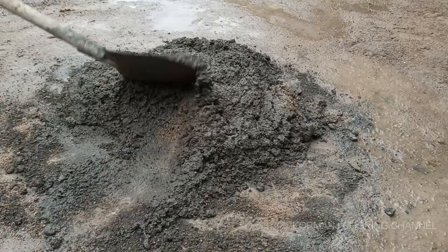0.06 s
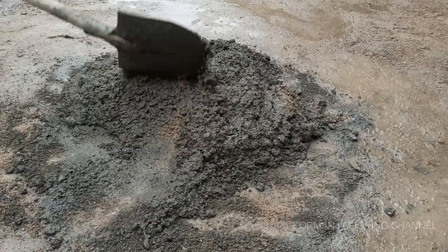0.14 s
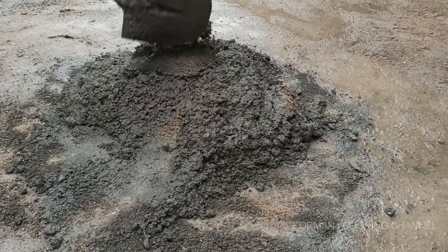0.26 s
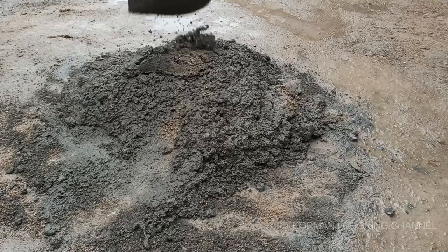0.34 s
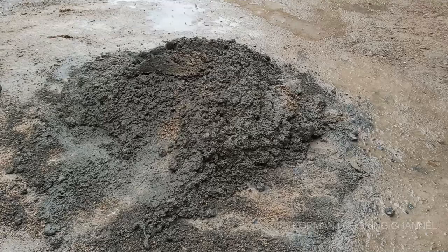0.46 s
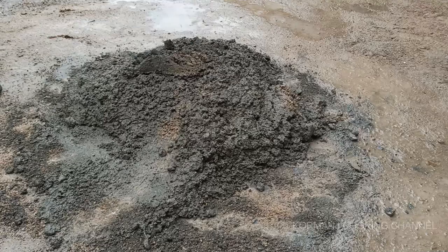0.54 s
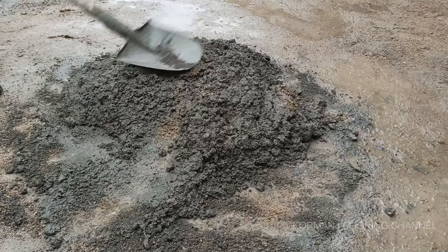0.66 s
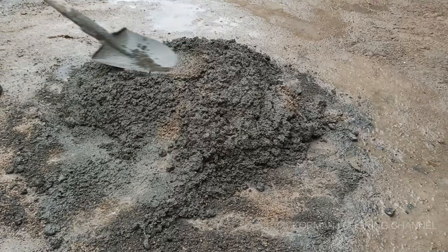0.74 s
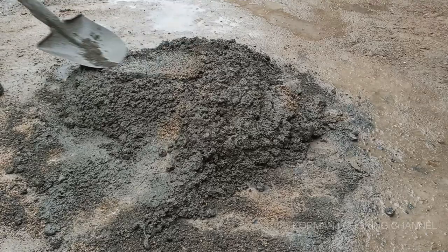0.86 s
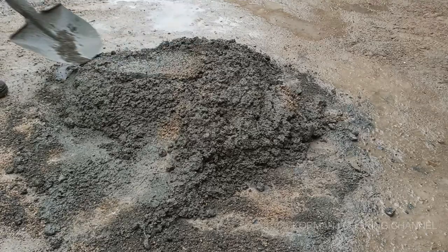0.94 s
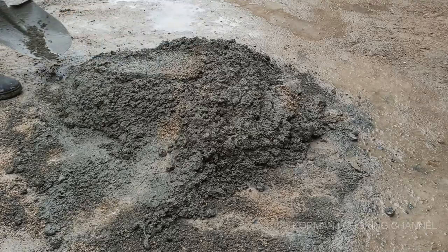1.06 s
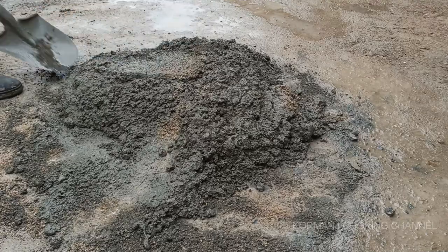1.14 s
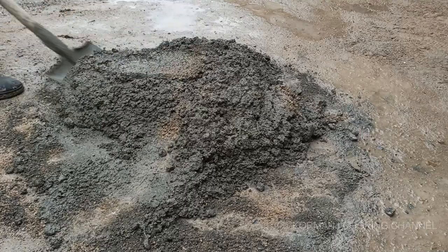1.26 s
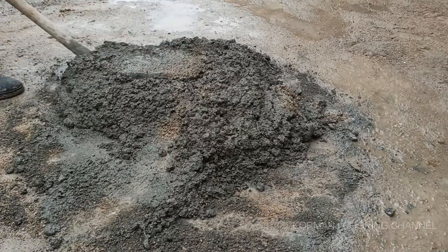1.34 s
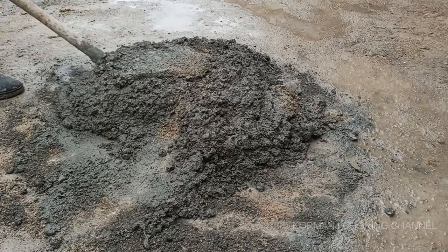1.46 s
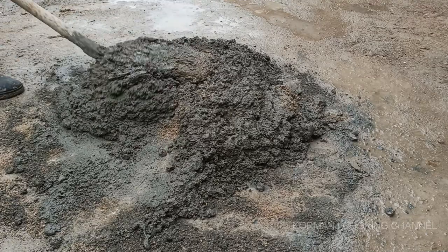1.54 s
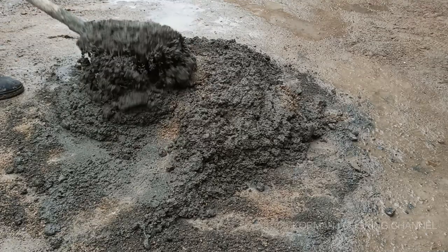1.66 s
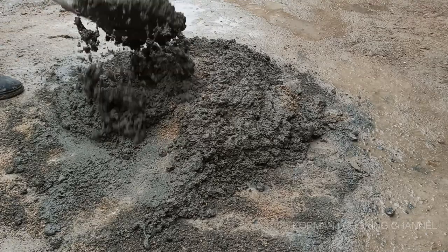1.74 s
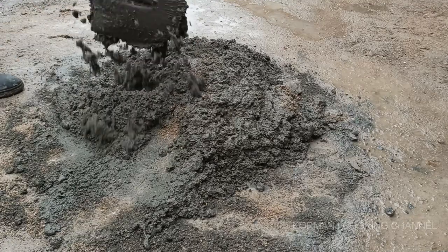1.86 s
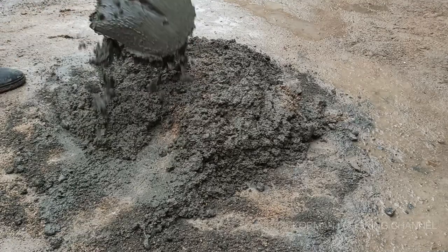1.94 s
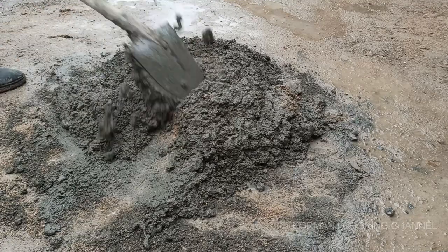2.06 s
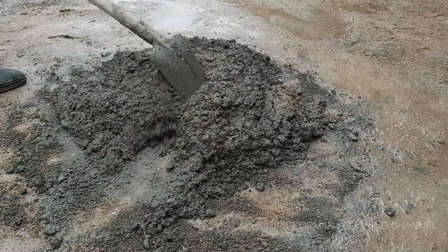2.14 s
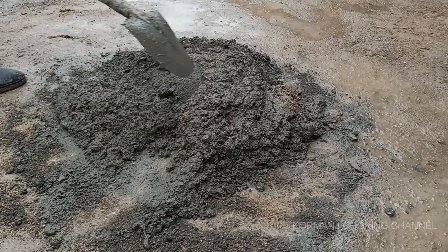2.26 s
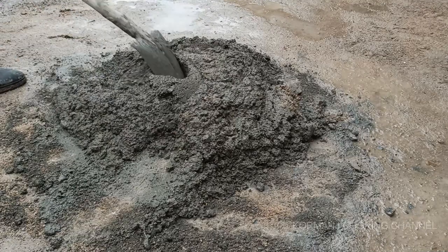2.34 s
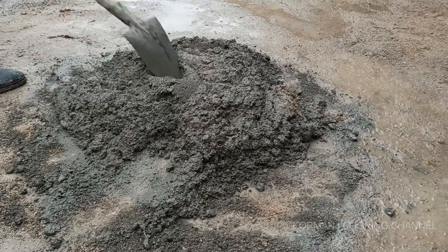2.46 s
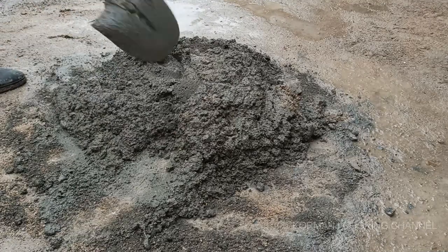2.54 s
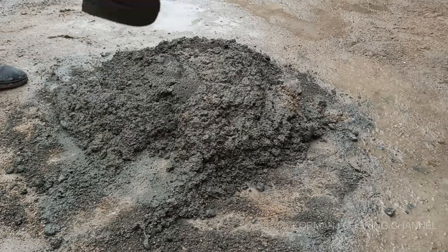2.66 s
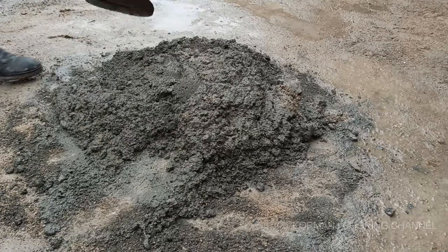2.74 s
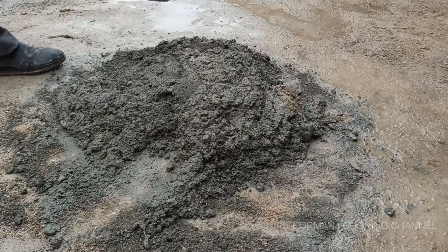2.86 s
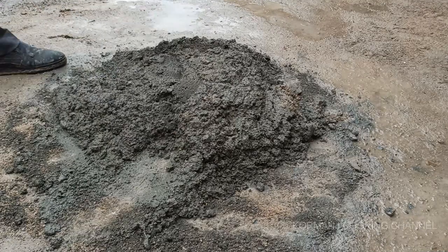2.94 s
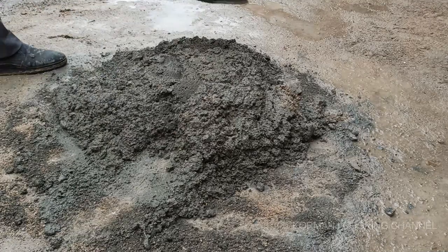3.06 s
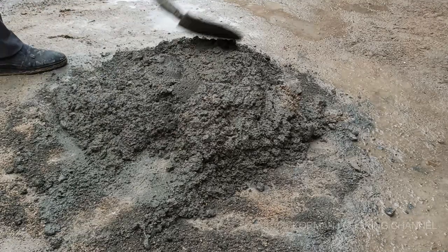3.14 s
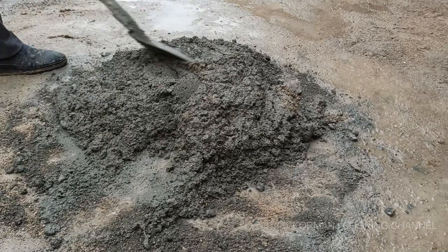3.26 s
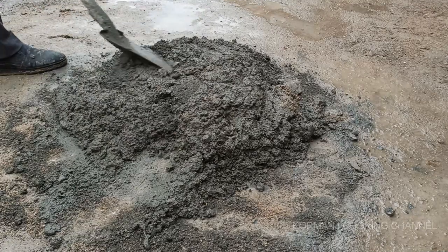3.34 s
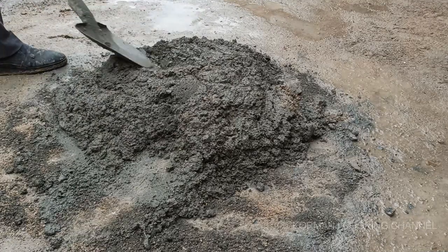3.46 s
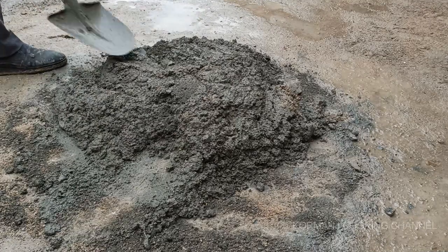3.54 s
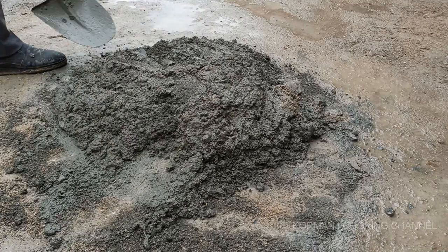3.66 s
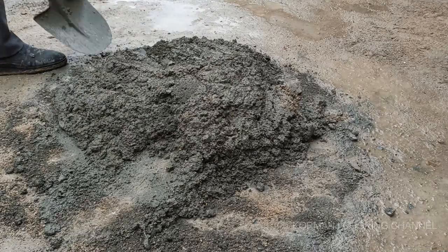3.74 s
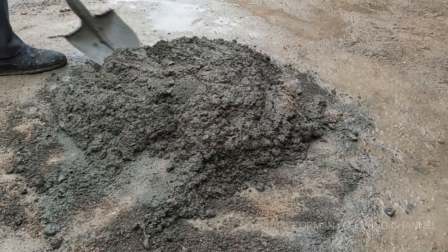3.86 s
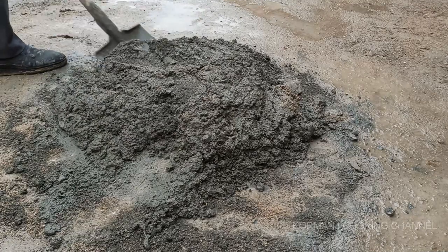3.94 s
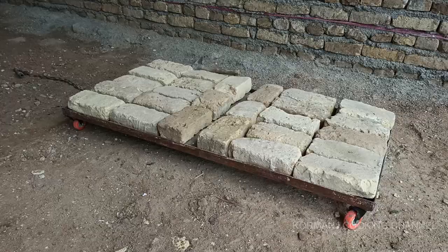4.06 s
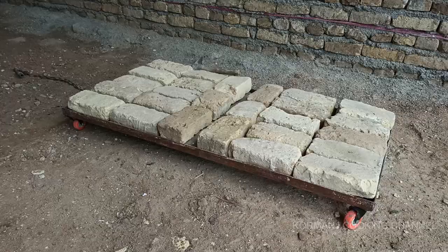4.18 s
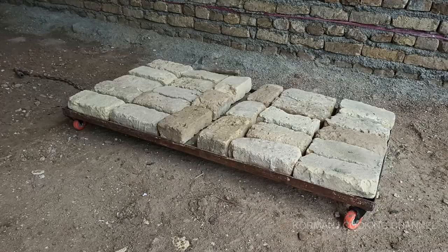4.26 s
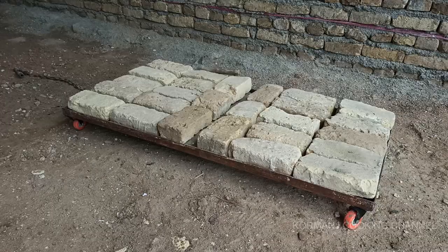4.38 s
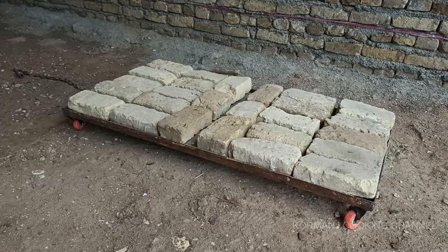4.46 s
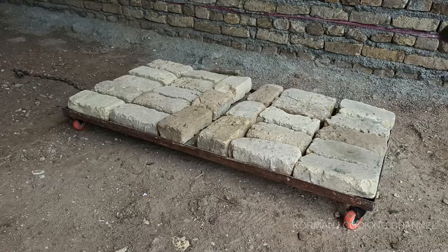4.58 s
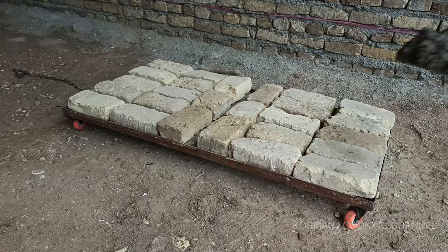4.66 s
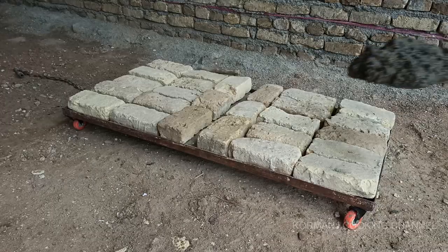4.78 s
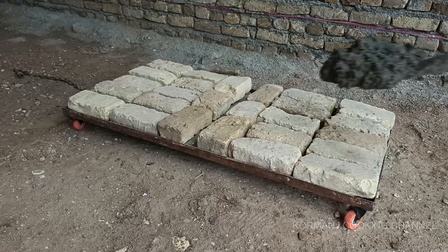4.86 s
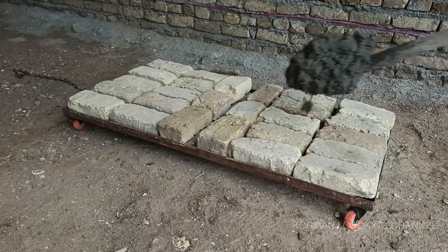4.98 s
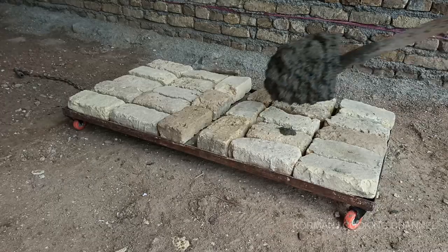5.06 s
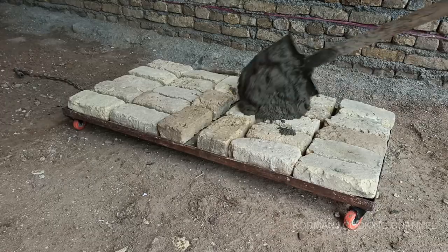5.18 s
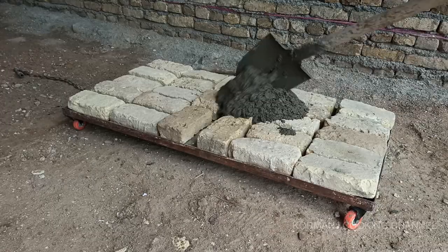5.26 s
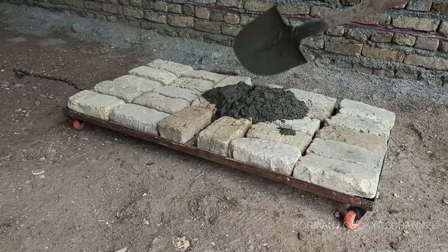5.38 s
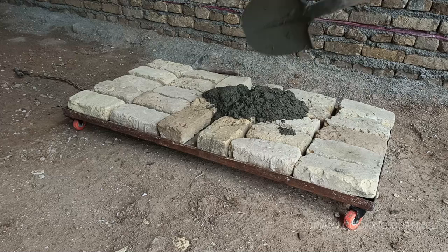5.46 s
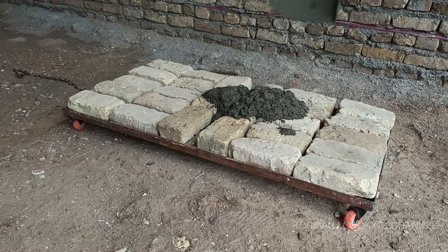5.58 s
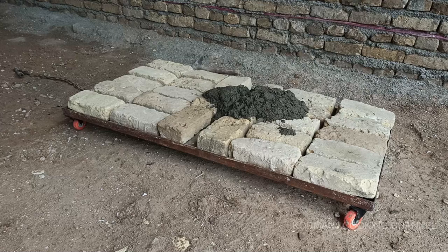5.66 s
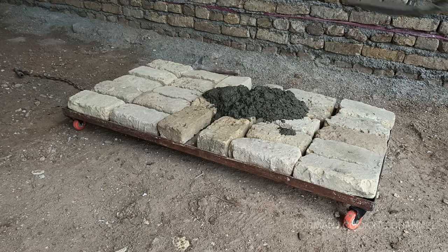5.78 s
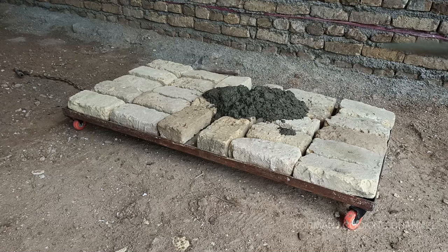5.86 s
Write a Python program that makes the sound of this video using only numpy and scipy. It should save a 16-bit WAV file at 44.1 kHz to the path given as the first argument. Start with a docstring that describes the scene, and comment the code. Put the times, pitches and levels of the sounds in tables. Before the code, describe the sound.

A steel shovel works wet concrete in a yard, slightly left of the microphone, over low outdoor air. After a faint sliding hiss, the blade strikes and scrapes grit at 0.7 seconds. At 1.3 it hits harder and crunches into the heap, with wet slaps around 1.4. The mix slides off the steel in a swelling hiss, with lighter scrapes and plops from 2.1 to 2.6. A sharp strike and rasp come at 3.2. Another strong dig at 3.9 brings a cluster of slaps and dull thumps. From about 4.2 a distant machine hums faintly and the work moves slightly right. A pebble clicks sharply at 4.7, and between 5.1 and 5.5 a load slides onto bricks with a plop and more stone clicks. A small squelch follows at 5.7. Crumbs tick throughout, and the walls return a faint echo.

```python
"""A steel shovel works a heap of wet concrete on a hard yard floor, a little left of the microphone.
The blade strikes, grinds through grit and ploughs into the mix, which slides off and slaps down.
Then a load is tipped onto bricks near a wall. Small stones tick, pockets in the wet mix squelch,
and the yard walls answer faintly. Behind it all is open air and, by the wall, a far-off machine's hum."""
import sys
import numpy as np
from scipy import signal
from scipy.fft import rfft, irfft, next_fast_len
from scipy.io import wavfile
from scipy.ndimage import map_coordinates

SR = 44100
rng = np.random.default_rng(int(sys.argv[2]) if len(sys.argv) > 2 else 0)


def unload_audio(sound):
    """Save the sound as a 16-bit wav file, at the path given as the first command line argument."""
    columns = np.transpose(np.atleast_2d(sound))
    # keep every value between -1 and 1, then stretch to whole-number steps
    steps = np.round(np.clip(columns, -1, 1) * 32767)
    wavfile.write(sys.argv[1], SR, steps.astype(np.int16))


N = 261072


def amp(db):
    """Decibels to gain."""
    return 10 ** (np.asarray(db) / 20)


def unit(x):
    """Scale to rms 1."""
    return x / np.sqrt(np.mean(x ** 2) + 1e-20)


def peaked(x, db):
    """Scale so that the mean of the left and right peaks reaches db."""
    return amp(db) * x / np.abs(x).max(axis=1).mean()


def along(points, hz):
    """Read (Hz, value) points on a log axis."""
    f, v = np.transpose(points)
    return np.interp(np.log(hz + 1), np.log(f + 1), v)


def wobble(n, rate):
    """A smooth random curve of n samples, rate knots a second."""
    return map_coordinates(rng.standard_normal(int(n * rate / SR) + 4), [np.arange(n) * rate / SR])


def filtered(x, response):
    """Pass x through a response given as a function of frequency."""
    n = x.shape[-1]
    m = next_fast_len(n + 8192)
    return irfft(rfft(x, m) * response(np.fft.rfftfreq(m, 1 / SR)), m)[..., :n]


def resonance(f, hz, width_hz):
    """Causal response of one damped mode."""
    return 1j * f * width_hz / (hz * hz - f * f + 1j * f * width_hz)


def add(track, start, sound):
    """Mix a short stereo sound in at start seconds."""
    part = track[:, max(round(start * SR), 0):][:, :sound.shape[1]]
    part += sound[:, :part.shape[1]]


# How alike the microphone's two sides are. Each row: frequency in Hz, correlation.
STEREO_LIKENESS = [(200, .97), (500, .9), (1200, .7), (2500, .42), (6000, .2)]


def spread(pair):
    """Two unrelated signals become left and right, alike in the bass."""
    turn = lambda f: np.arccos(np.clip(along(STEREO_LIKENESS, f), -1, 1)) / 2
    mid, side = filtered(pair, lambda f: np.array([np.cos(turn(f)), np.sin(turn(f))]))
    return np.array([mid + side, mid - side])


def noise(n, spectrum):
    """Steady stereo noise of rms 1, shaped by (Hz, dB) points."""
    return unit(filtered(spread(rng.standard_normal((2, n))), lambda f: amp(along(spectrum, f))))


def burst(response, rise, t60):
    """A short stereo puff of noise through a response; rise and t60 are in seconds."""
    t = np.arange(SR // 4) / SR
    puff = rng.standard_normal((2, len(t))) * (1 - np.exp(-t / rise)) * amp(-60 * t / t60)
    return filtered(spread(puff), response)


def grains(n, rate, scatter_db, bed, life):
    """Stereo crackle: tiny fractures of scattered size over a bed of countless smaller ones."""
    sizes = (rng.random(n) < rate / SR) * amp(scatter_db * np.clip(rng.standard_normal(n), -2, 2))
    power = signal.lfilter([1], [1, -np.exp(-1 / (life * SR))], sizes ** 2)
    return spread(rng.standard_normal((2, n)) * np.sqrt(power / power.mean() + bed ** 2))


def stroke(start, stop, attack, t60):
    """Times of one movement, and a gate that opens, holds until it stops, then dies away."""
    t = np.arange(start, stop + t60, 1 / SR)
    return t, np.minimum((t - start) / attack, 1) * amp(-60 * np.maximum(t - stop, 0) / t60)


# The air over the yard. Each row: frequency in Hz, relative level in dB.
AIR_SPECTRUM = [(25, -34), (45, -15), (80, -6), (200, -0.5), (400, -3), (900, -14.5), (1600, -33.5),
                (4000, -24), (9000, -22)]


def open_air():
    """A low, gently wavering murk all around the microphone."""
    return noise(N, AIR_SPECTRUM) * amp(-53.0 + 2.4 * wobble(N, 4.89))


# The machine's tones, from far off. Each row: pitch in Hz, level in dB.
HUM_TONES = [(105, -60), (199, -62.5), (301, -54)]


def distant_machine():
    """An unsteady hum, heard beside the wall: it comes in just before the work reaches the bricks."""
    t = np.arange(N) / SR
    hum = sum(amp(db + 2.8 * wobble(N, 11)) * np.sin(2 * np.pi * hz * t + 1.56 * wobble(N, 29))
              for hz, db in HUM_TONES)
    return hum * np.interp(t, [4.1, 4.25], [0, 1])


# The yard's reverberation. Each row: frequency in Hz, t60 in seconds.
WALL_DECAY = [(150, 0.81), (1500, 0.25), (6000, 0.2), (15000, 0.14)]


def walls(x):
    """The tail that comes back from the yard walls, dying faster in the treble."""
    hz, t, spectra = signal.stft(rng.standard_normal((2, SR // 2)), SR, nperseg=256)
    decay = amp(-60 * t / along(WALL_DECAY, hz)[:, None])
    tail = spread(signal.istft(spectra * decay, SR, nperseg=256)[1])
    delayed = np.pad(tail, ((0, 0), (300, 0))) / np.linalg.norm(tail[0])
    return signal.fftconvolve(x, delayed, axes=1)[:, :N]


def crumbs():
    """Crumbs of the mix drop and settle all the time, with tiny bright ticks."""
    scatter_db = 4 * np.clip(rng.standard_normal((2, N)), -2, 2)
    ticks = (rng.random(N) < 12 / SR) * amp(-33.5 + scatter_db)
    return filtered(ticks, lambda f: resonance(f, hz=6000, width_hz=25500))


# The wet mix sucks and spits. Each row: start in seconds, level in dB, pitch in Hz,
# time scale of rise and decay in seconds.
POCKETS = [(0.154, -36.5, 3150, 0.0244), (2.949, -34, 5230, 0.034), (3.662, -44, 5500, 0.027),
           (3.741, -38.5, 1190, 0.01), (4.268, -39, 6500, 0.014), (4.507, -40, 864, 0.028),
           (4.873, -36.5, 6120, 0.03), (5.122, -33.5, 7650, 0.013), (5.719, -25.5, 4925, 0.017)]


def squelches():
    """Air and water squeeze through pockets in the mix: large ones plop, tiny ones only spit."""
    out = np.zeros((2, N))
    for start, db, hz, scale in POCKETS:
        width_hz = 0.27 * hz * np.sqrt(hz / 1000)
        pocket = burst(lambda f: resonance(f, hz, width_hz) ** 2, rise=0.1 * scale, t60=4 * scale)
        add(out, start, peaked(pocket, db + 4))
    return out


# Loose stones around the shovel. Each row: start in seconds, level in dB, pitch in Hz.
STONE_CLICKS = [(1.179, -26.5, 4300), (1.2221, -29, 7500), (1.9847, -22, 6100), (2.8287, -35, 6500),
                (3.0746, -26.5, 3800), (3.569, -32, 5510), (3.7952, -31, 9000), (4.3225, -40, 8000),
                (4.7125, -15.5, 2600), (4.793, -27.5, 4600), (5.226, -23.5, 2250), (5.2601, -15.5, 2320),
                (5.3993, -20, 1910), (5.7139, -25, 5100)]


def stones():
    """Single pebbles click, each at its own pitch, snap brightly and crush a little sand."""
    out = np.zeros((2, N))
    impulse = np.eye(1, SR // 4).repeat(2, axis=0)
    for start, db, hz in STONE_CLICKS:
        click = filtered(impulse, lambda f: resonance(f, hz, width_hz=0.77 * hz) ** 2)
        snap = filtered(impulse, lambda f: resonance(f, hz=2 * hz, width_hz=3 * hz))
        sand = burst(lambda f: resonance(f, hz, width_hz=0.53 * hz), rise=0.0001, t60=0.014)
        add(out, start, peaked(click, db + 1) + peaked(snap, db - 1) + peaked(sand, db - 4))
    return out


# Lumps come down on the heap, later on the bricks. Each row: time in seconds, level of plop and
# splat in dB, plop pitch in Hz, thump level in dB.
LUMPS = [(0.752, -19, 676, -28), (1.399, -14, 506, -29), (1.434, -11.5, 413, -18), (1.907, -40, 497, -34),
         (2.121, -25, 600, -23), (2.435, -30, 397.6, -33.5), (3.951, -9, 560, -18), (3.997, -17, 330, -14),
         (4.052, -13.5, 484, -17), (4.264, -31.5, 284, -41), (4.77, -35.5, 404, -29.5),
         (5.26, -20, 660, -18)]


def slaps():
    """Wet lumps land with a hollow plop, a splat and a dull thump of the ground."""
    out = np.zeros((2, N))
    for time, db, hz, thump_db in LUMPS:
        plop = burst(lambda f: resonance(f, hz, width_hz=0.69 * hz) ** 2, rise=0.00044, t60=0.047)
        splat = burst(lambda f: resonance(f, hz=955, width_hz=1150), rise=0.0004, t60=0.045)
        thump = burst(lambda f: resonance(f, hz=179.3, width_hz=100) ** 2, rise=0.00087, t60=0.037)
        add(out, time - 0.002, peaked(plop, db - 4) + peaked(splat, db - 12) + peaked(thump, thump_db - 6))
    return out


# The muddy blade's main modes. Each row: pitch in Hz, width in Hz, gain in dB.
BLADE_MODES = [(530, 10, -27), (704, 15, -5.5), (905, 67, -8), (1162, 166, -6), (1667, 49, -4),
               (2600, 86, -2), (3110, 72, -2), (3570, 78, -3), (6740, 80, -12.5)]


def blade(spectrum, direct):
    """The response for contact noise of this spectrum, partly direct and partly rung through the blade."""
    modes = lambda f: sum(amp(db) * resonance(f, hz, width) for hz, width, db in BLADE_MODES)
    return lambda f: amp(along(spectrum, f)) * (direct + modes(f))


def steel_ring(x, ring_db, t60):
    """Add the steel's many weak modes, which shift with every load and grip; none lie in the deep bass."""
    t = np.arange(SR // 6) / SR
    tail = spread(rng.standard_normal((2, len(t))) * amp(-60 * t / t60))
    tail = filtered(tail, lambda f: f ** 2 / (f ** 2 + 350 ** 2))
    ring = signal.fftconvolve(x, tail / np.linalg.norm(tail[0]), axes=1)[:, :x.shape[1]]
    return x + amp(ring_db) * ring


# The blade comes free. Each row: start in seconds, peak in dB, centre of the stirred modes in Hz.
BLADE_LIFTS = [(2.595, -42.5, 1410), (3.15, -47.5, 700)]
FREE_T60, STIRRED_OCTAVES = 0.27, 0.35


def lifts():
    """Out of the mix, nothing damps the blade, and a few of its modes sing on briefly."""
    out = np.zeros((2, N))
    t = np.arange(SR // 3) / SR
    for start, db, centre_hz in BLADE_LIFTS:
        stirred = lambda hz: np.exp(-(np.log2(hz / centre_hz) / STIRRED_OCTAVES) ** 2)
        ring = sum(stirred(hz) * np.sin(2 * np.pi * hz * t + 0.5 * wobble(len(t), 39))
                   for hz, _, _ in BLADE_MODES)
        ring *= (1 - np.exp(-t / 0.012)) * amp(-60 * t / FREE_T60)
        add(out, start, peaked(np.array([ring, ring]), db))
    return out


# Sand against steel. Each row: frequency in Hz, relative level in dB.
SAND_SPECTRUM = [(300, -38), (1200, -7), (2400, -3.5), (3400, 0.5), (4500, 2), (7000, 1), (12000, -5),
                 (16000, -5)]
# Gravel against steel. Each row: frequency in Hz, relative level in dB.
GRAVEL_SPECTRUM = [(50, -21), (100, -16.5), (180, -4), (270, -9), (400, 0.5), (1100, 0), (1900, -0.5),
                   (2700, -5), (4000, -10.5), (7000, -17.5)]


def rub(level, gravel_db, direct, scatter_db, bed):
    """Sand hisses and gravel grinds along the steel; the blade sticks and slips, shaking both."""
    n = len(level)
    sand = grains(n, rate=1700, scatter_db=scatter_db, bed=bed, life=0.00028)
    hiss = unit(filtered(sand, blade(SAND_SPECTRUM, direct)))
    gravel = grains(n, rate=500, scatter_db=4.5, bed=0.85, life=0.00051)
    grind = unit(filtered(gravel, blade(GRAVEL_SPECTRUM, direct=1.0)))
    judder = amp(1.1 * wobble(n, 70) + 0.5 * wobble(n, 18))
    contact = amp(-2.5) * hiss + amp(gravel_db - 2) * grind
    return steel_ring(level * judder * contact, ring_db=-3.5, t60=0.035)


def settling():
    """The heap keeps settling faintly, in fits and starts."""
    return rub(amp(-56 + 1.5 * wobble(N, 14)), gravel_db=-8, direct=6.4, scatter_db=9.5, bed=0.48)


# Wet mix slides over or off the steel. Each row: start, fullest moment and end in seconds,
# fullest level in dB, thinning to either side in dB a second, gravel balance in dB.
MIX_SLIDES = [(0.0, 0.197, 0.565, -42, 10.5, -6.5), (1.449, 2.282, 2.448, -32.5, 17.5, -10),
              (2.451, 2.53, 2.76, -44, 56, -10), (3.062, 3.198, 3.22, -51.5, 37, -2),
              (4.709, 4.723, 4.8, -47, 55, 5), (5.119, 5.325, 5.55, -30.5, 130, -3),
              (5.549, 5.682, 5.88, -49.5, 68, -29)]
CREST_S = 0.032  # a flow rounds off around its fullest moment


def slides():
    """The flow of mix over the steel swells and thins again, coming off in clumps."""
    out = np.zeros((2, N))
    for start, fullest, end, db, thinning, gravel_db in MIX_SLIDES:
        t, gate = stroke(start, end, attack=0.00333, t60=0.15)
        from_crest = np.hypot(t - fullest, CREST_S) - CREST_S
        clumps_db = 0.8 * wobble(len(t), rate=23.6)
        flow = gate * amp(db - thinning * from_crest + clumps_db)
        add(out, start, rub(flow, gravel_db, direct=11.0, scatter_db=5.0, bed=1.0))
    return out


# Grit rasps along the steel. Each row: start and stop in seconds, first and last level in dB,
# gravel balance in dB, opening accent in dB, release t60 in seconds, left minus right in dB.
GRIT_SCRAPES = [(0.735, 0.962, -30, -26.5, -10.5, 17.5, 0.15, 1),
                (1.111, 1.156, -51, -47, -3.5, 6, 0.41, -2), (1.262, 1.407, -24, -17.5, -8.5, 5.5, 0.31, 0),
                (2.109, 2.197, -28, -35, -5.5, 0.5, 0.18, 0.5),
                (2.374, 2.448, -32.5, -27.5, -3, 2, 0.038, 0.5),
                (2.511, 2.587, -34, -32, -9.5, 1, 0.24, 0.5),
                (3.225, 3.311, -27, -26.5, -5.5, 2.5, 0.44, -1),
                (3.443, 3.514, -47, -41.5, -11, 0, 0.11, 2.5),
                (3.883, 4.052, -18.5, -24.5, -10, 1, 0.21, 0),
                (5.207, 5.289, -36, -36, -2.5, -2, 0.2, -1.5)]
ATTACK_S, ACCENT_S = 0.0083, 0.017  # the short fade-in of each scrape and crunch; the accent's fade


def scrapes():
    """Grit rasps along the steel as the blade is pushed or a load slides quickly off."""
    out = np.zeros((2, N))
    for start, stop, first_db, last_db, gravel_db, accent_db, t60, place_db in GRIT_SCRAPES:
        t, gate = stroke(start, stop, ATTACK_S, t60)
        level_db = np.interp(t, [start, stop], [first_db, last_db])
        level_db += accent_db * np.exp(-((t - start) / ACCENT_S) ** 2)
        scrape = rub(gate * amp(level_db), gravel_db, direct=0.9, scatter_db=5.0, bed=0.74)
        add(out, start, scrape * amp([[place_db / 2], [-place_db / 2]]))
    return out


# The crunch under the heap. Each row: frequency in Hz, relative level in dB.
CRUNCH_SPECTRUM = [(100, -40), (250, -10), (340, -0.5), (480, -2), (800, -3), (1200, -11.5), (2200, -50),
                   (6000, -42)]
# The dull shove against the heap. Each row: frequency in Hz, relative level in dB.
SHOVE_SPECTRUM = [(30, -54), (60, -14), (100, -5), (135, -6), (172, 2), (210, 5), (260, -28), (600, -15)]
# The blade goes in. Each row: start, deepest point and stop in seconds, crunch and shove levels in dB.
HEAP_THRUSTS = [(1.275, 1.368, 1.457, -21.5, -22.5), (3.886, 3.972, 4.03, -24, -25.5)]
BUILD_DB_PER_S, EASE_DB_PER_S, SHOVE_FADE_DB_PER_S = 104, 50, 148  # slopes around the deepest point
HOLLOW_HZ, SAG_HZ_PER_S = 642, 3300


def plough():
    """The blade crunches under the heap and shoves it; its hollow note sinks as the load covers it."""
    out = np.zeros((2, N))
    centres = np.geomspace(320, 850, num=6)
    for start, deepest, stop, crunch_db, shove_db in HEAP_THRUSTS:
        t, gate = stroke(start, stop, ATTACK_S, t60=0.2)
        before, after = np.maximum(deepest - t, 0), np.maximum(t - deepest, 0)
        effort = gate * amp(crunch_db - BUILD_DB_PER_S * before - EASE_DB_PER_S * after)
        crunch = grains(len(t), rate=350, scatter_db=6.0, bed=0.28, life=0.0025)
        crunch = filtered(crunch, lambda f: amp(along(CRUNCH_SPECTRUM, f)))
        crunch = steel_ring(crunch, ring_db=-5.5, t60=0.45)
        shove = noise(len(t), SHOVE_SPECTRUM) * amp(shove_db - SHOVE_FADE_DB_PER_S * (before + after))
        # the note glides by crossfading between bands of the crunch
        hollow_hz = HOLLOW_HZ - SAG_HZ_PER_S * np.minimum(after, stop - deepest)
        bands = [unit(filtered(crunch, lambda f: resonance(f, hz, width_hz=170))) for hz in centres]
        shares = [np.interp(hollow_hz, centres, row) for row in np.eye(len(centres))]
        hollow = sum(share * band for share, band in zip(shares, bands))
        add(out, start, effort * hollow + shove)
    return out


def buried(x, muffle_hz=10000, hold_s=0.15):
    """From the deepest point of a thrust until just after it, the load dulls the blade's hiss."""
    t = np.arange(N) / SR
    cover = sum(np.interp(t, [deepest, stop, stop + hold_s, stop + 2 * hold_s], [0, 1, 1, 0])
                for _, deepest, stop, _, _ in HEAP_THRUSTS)
    return (1 - cover) * x + cover * filtered(x, lambda f: 1 / (1 + (f / muffle_hz) ** 4))


# The blade hits floor or stone. Each row: time in seconds, level in dB, knock balance in dB.
BLADE_STRIKES = [(0.7453, -8, -11), (0.933, -14, -42), (0.9579, -12.5, -36), (1.27, -4, -18.5),
                 (2.4231, -19.5, -8.5), (2.444, -25, 2), (3.2321, -2.5, -19), (3.2528, -15, 2),
                 (3.8879, -11, -7), (3.9518, -14, -18), (3.998, -9.5, -27)]


def strikes():
    """The edge crushes grit against the floor and the damped blade rings briefly."""
    out = np.zeros((2, N))
    for time, db, knock_db in BLADE_STRIKES:
        crack = burst(blade(SAND_SPECTRUM, direct=1.0), rise=0.0025, t60=0.014)
        knock = burst(blade(GRAVEL_SPECTRUM, direct=0.093), rise=0.0017, t60=0.016)
        hit = peaked(crack, db - 0.5) + peaked(knock, db + knock_db + 4)
        add(out, time - 0.001, steel_ring(hit, ring_db=-5.5, t60=0.28))
    return out


# The work's balance at the microphone. Each row: frequency in Hz, left minus right in dB.
STEREO_LEAN = [(200, 1), (1500, 0), (4000, 0.8), (7000, 2.5), (14000, 0.5)]


def placed(x, left_lead_s):
    """The work is a little louder on the left; the side it reaches first gives its direction."""
    sides = np.array([[0.5], [-0.5]])
    balance = lambda f: amp(sides * along(STEREO_LEAN, f))
    return filtered(x, lambda f: balance(f) * np.exp(2j * np.pi * f * sides * left_lead_s))


BRICKS_FROM_S = 4.4


def scene():
    """The shovel works left of centre at the heap, then right of it at the bricks; the walls answer."""
    rubbing = buried(scrapes()) + settling() + slides() + plough()
    blows = strikes() + slaps() + stones() + crumbs() + squelches() + lifts()
    work = rubbing + blows + walls(amp(-23.0) * rubbing + amp(-14.5) * blows)
    at_heap, at_bricks = placed(work, left_lead_s=0.00015), placed(work, left_lead_s=-0.00005)
    shovel = np.where(np.arange(N) / SR < BRICKS_FROM_S, at_heap, at_bricks)
    return shovel + open_air() + distant_machine()


# The microphone's colour. Each row: frequency in Hz, gain in dB.
MIC_RESPONSE = [(100, -1), (4650, 3.5), (4900, -3.5), (5900, -1.5), (6450, 9), (6800, 8.5), (7600, 9.5),
                (7850, 1.5), (8500, -3.5), (9000, -35), (11200, -12.5), (11700, -5.5), (15600, -2)]
TOP_HZ = 15900


def record(dry):
    """The microphone has a bright peak and a deep notch above it; nothing passes the band limit."""
    return filtered(dry, lambda f: amp(along(MIC_RESPONSE, f)) * (f < TOP_HZ))


dry = scene()
out = record(dry)
unload_audio(out)
```